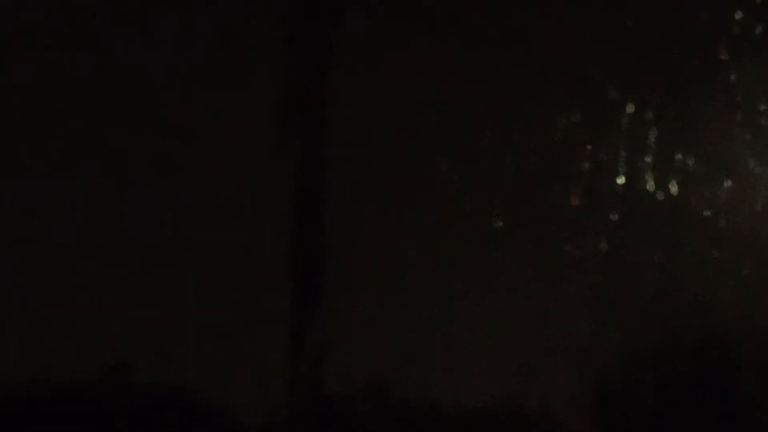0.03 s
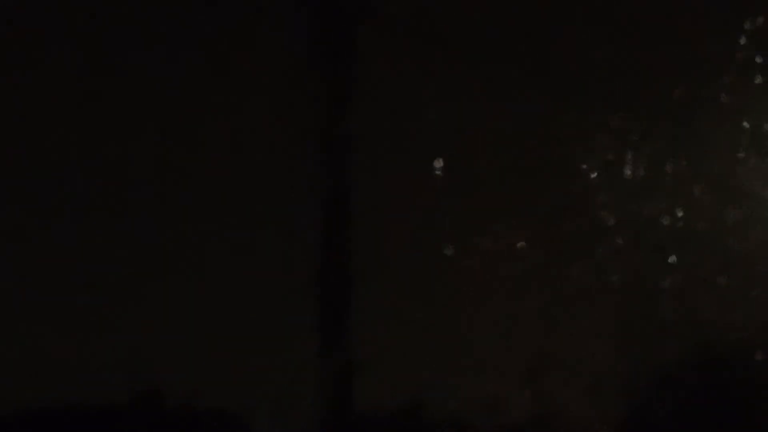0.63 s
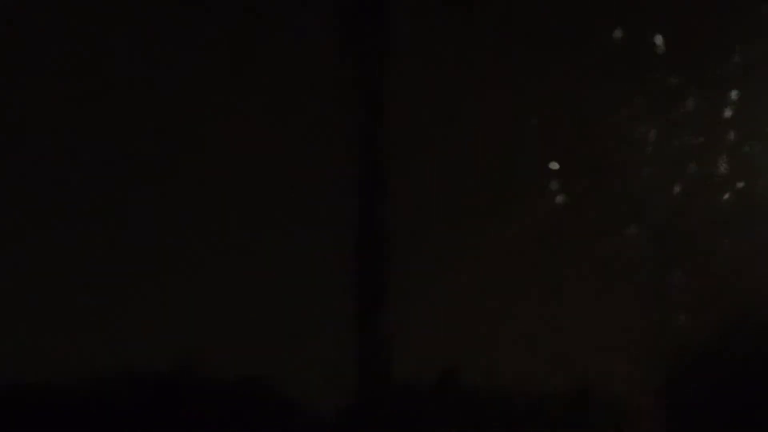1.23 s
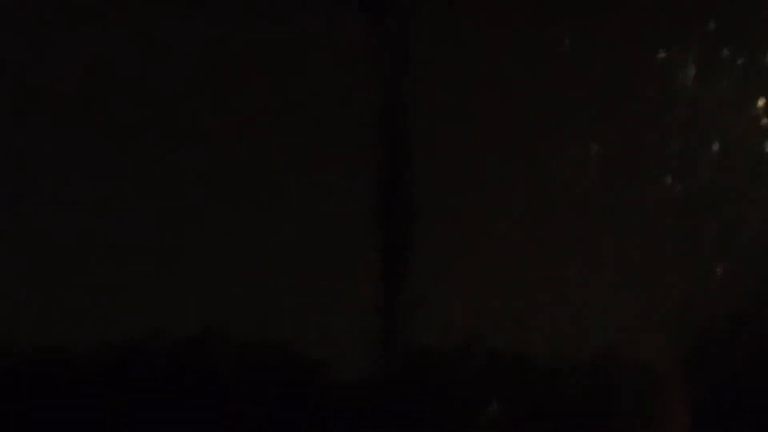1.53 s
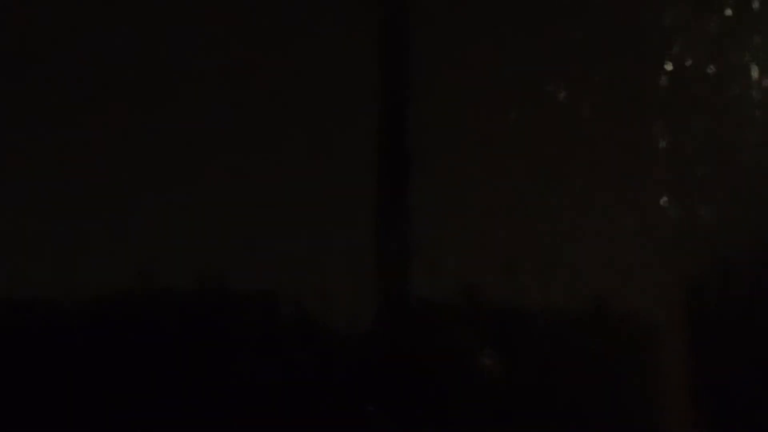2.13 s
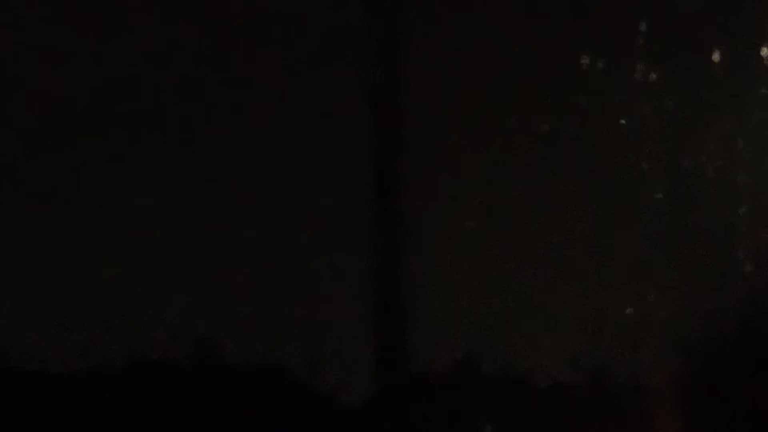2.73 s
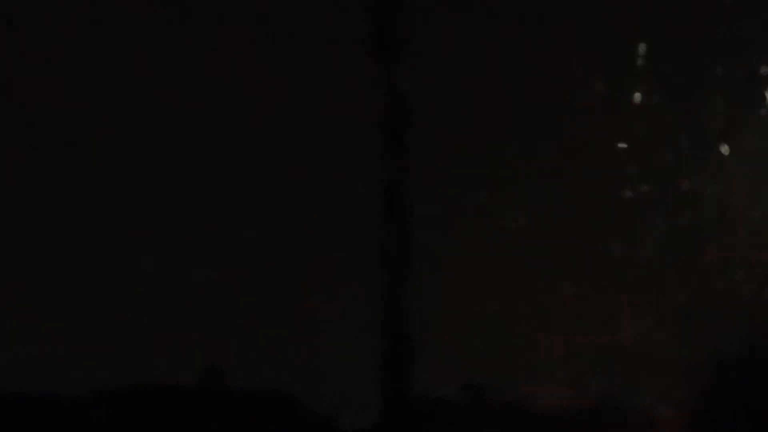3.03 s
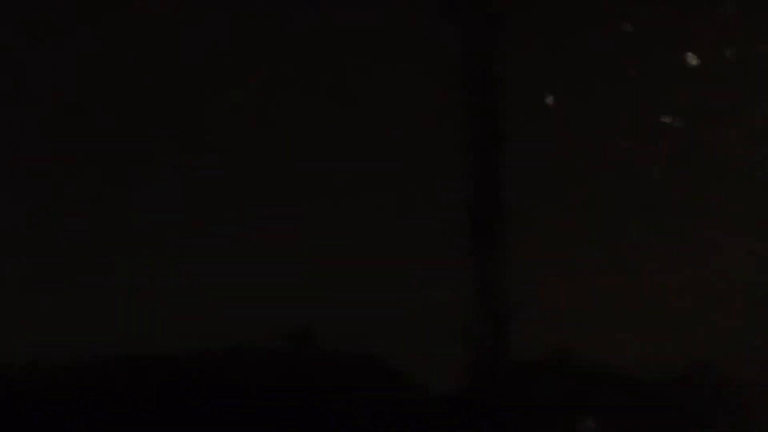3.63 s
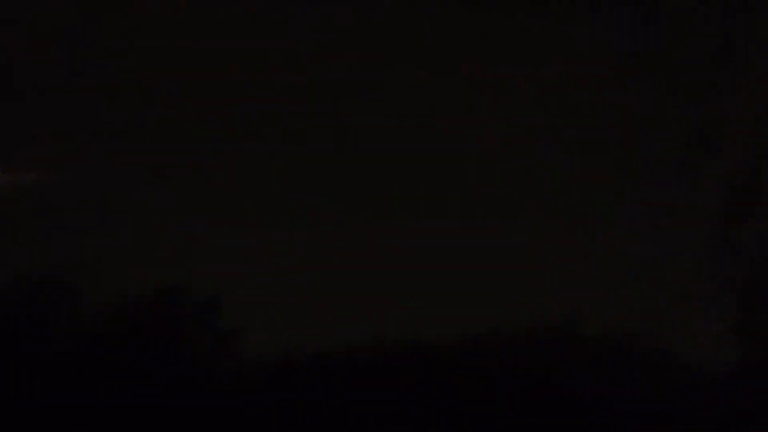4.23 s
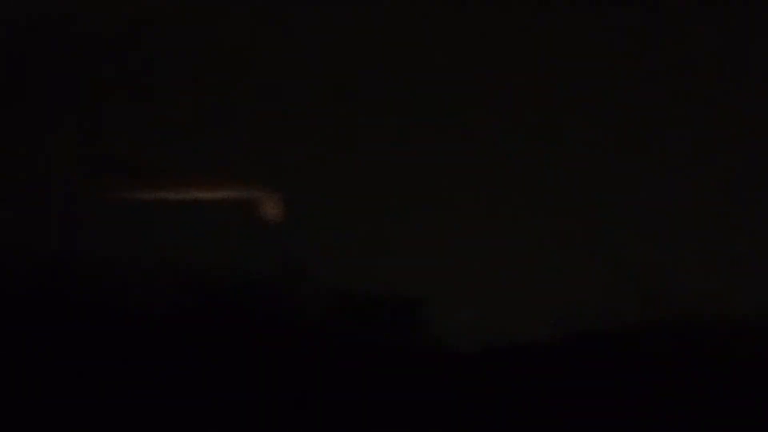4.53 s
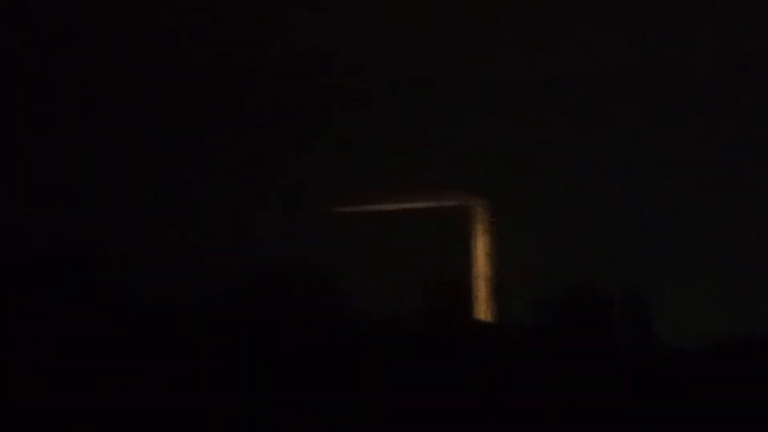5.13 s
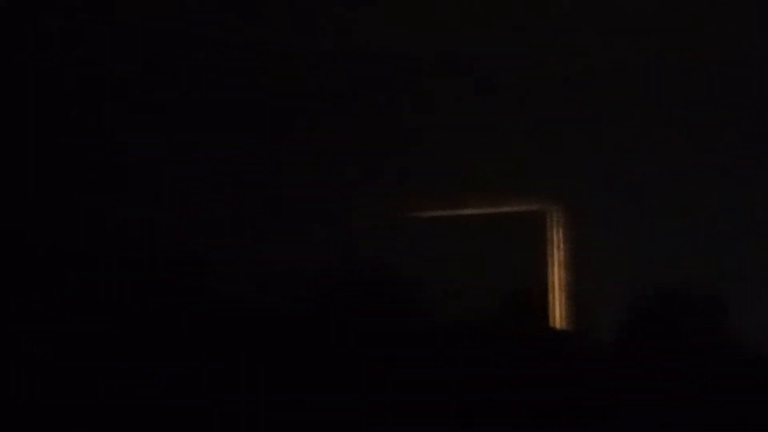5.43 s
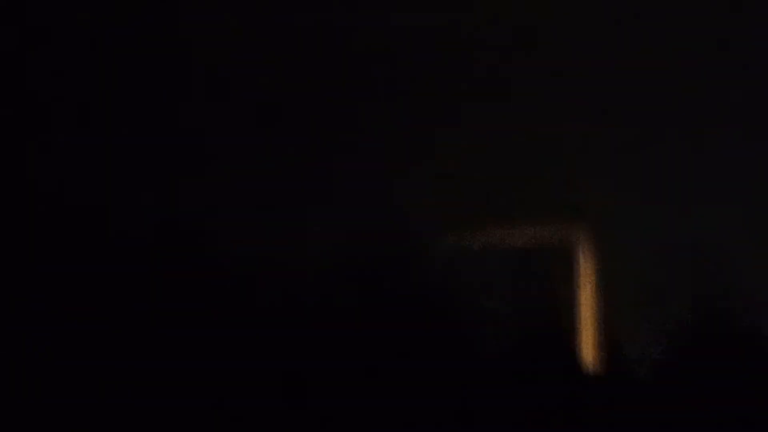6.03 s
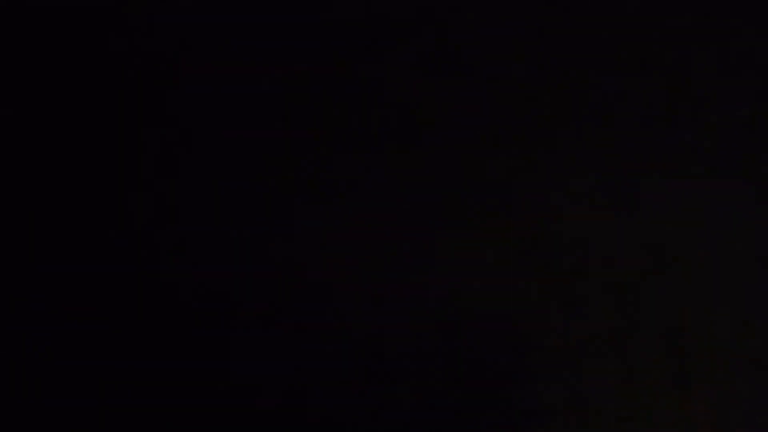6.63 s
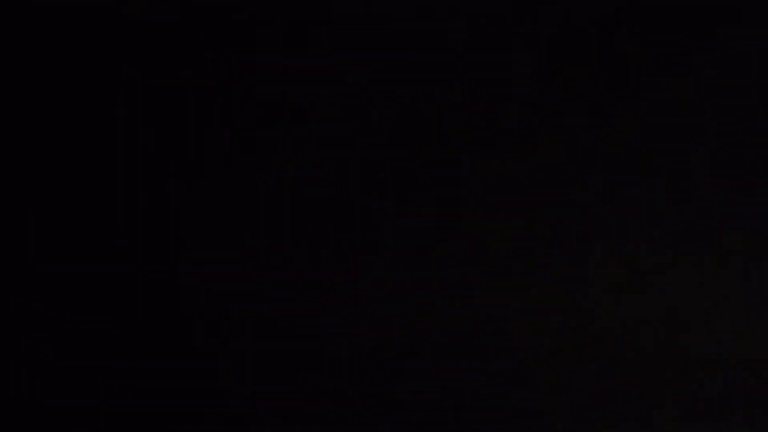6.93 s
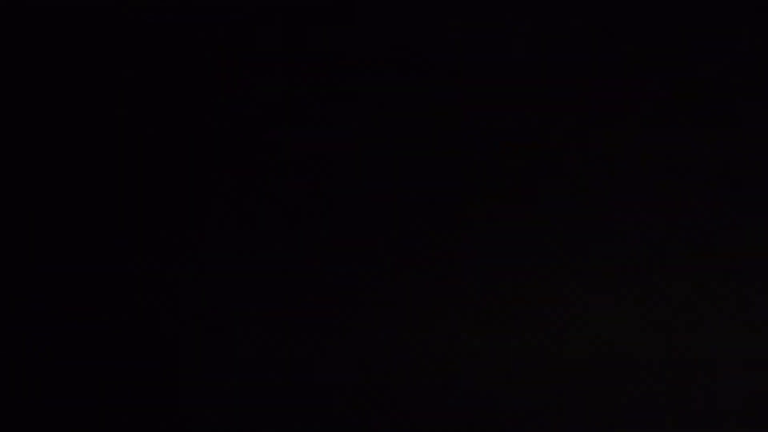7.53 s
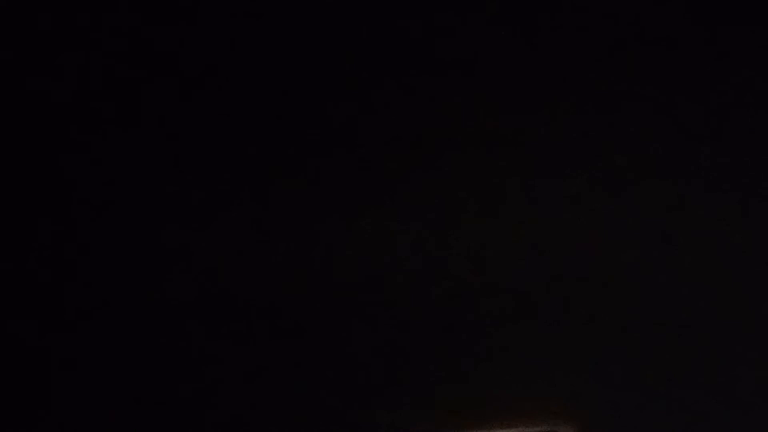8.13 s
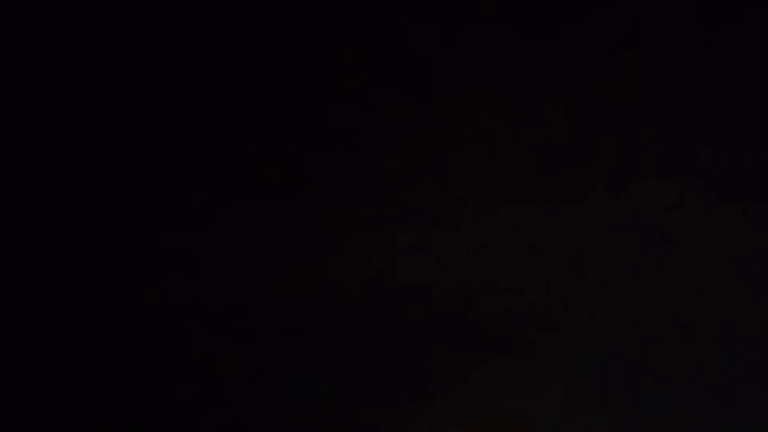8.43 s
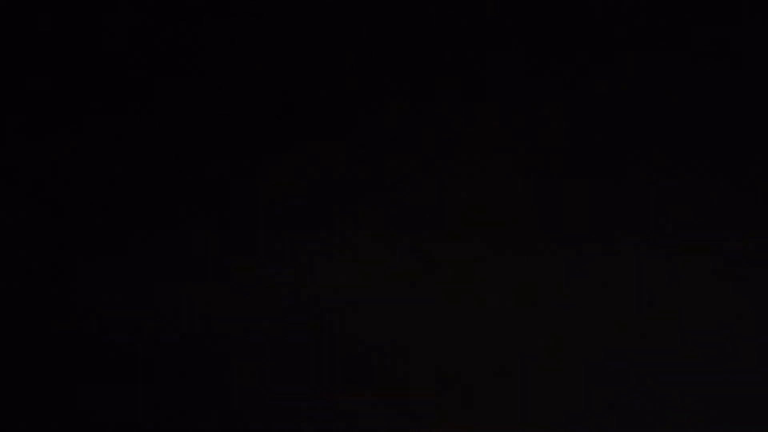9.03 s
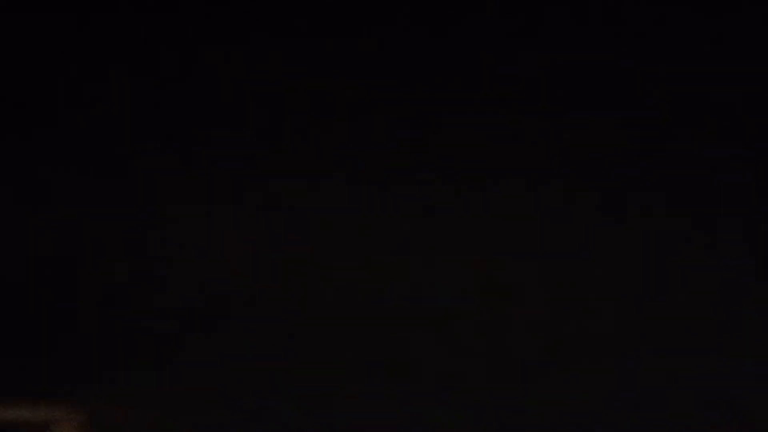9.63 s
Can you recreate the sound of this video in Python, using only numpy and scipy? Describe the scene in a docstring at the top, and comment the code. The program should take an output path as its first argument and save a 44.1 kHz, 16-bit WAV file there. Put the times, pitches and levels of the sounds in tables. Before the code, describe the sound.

Light rain falls throughout outside a house at night: a soft patter and fine spray all around, over a faint, low, distant wash. Fat drips tap a hard surface close by, several a second at uneven intervals, each with a short ring and a small splash. From about 2 to 3 seconds a gust hits the microphone in two bursts of sharp pops, low buffeting and throbbing rumble, by far the loudest sound. Wet leaves swish softly from 3 to about 4 seconds, and the drips grow a little stronger. The hand holding the microphone makes a cluster of dull bumps from about 4.3 to 5.7 seconds, then single knocks near 7.1 and 8.8 seconds, with faint ticks and finger brushes scattered around. The quiet rain and dripping continue to the end, near 10 seconds.

```python
"""Light rain at night

Heard from a house: a low far wash, patter all around, and fat drips that ring a hard surface close by.
A gust buffets and pops on the microphone for a second, then wet leaves swish as they touch and rub.
The hand that holds the microphone bumps and brushes its case."""
import sys
import numpy as np
from scipy import signal
from scipy.fft import rfft, irfft, next_fast_len
from scipy.io import wavfile
from scipy.ndimage import map_coordinates

SR = 44100
rng = np.random.default_rng(int(sys.argv[2]) if len(sys.argv) > 2 else 0)


def generate_wav(signal):
    """Clip the signal to [-1, 1] and save it as 16-bit WAV at the path in sys.argv[1]."""
    frames = np.transpose(np.atleast_2d(signal))
    scaled = np.clip(frames, -1, 1) * 32767
    pcm = np.round(scaled).astype(np.int16)
    wavfile.write(sys.argv[1], SR, pcm)


N = 436149

# How loud the outdoor background is: (time [s], level [dB])
NIGHT_LEVELS = [(0, -70.5), (.7, -66.5), (1.7, -71.5), (3.15, -68.5), (4.5, -69), (5.3, -66), (6.75, -69.5),
                (7.5, -70), (8.5, -72.5), (9.89, -71)]
# Low notes that build up between the walls: (pitch [Hz], width [Hz], level [dB])
WALL_MODES = [(170.9, 7.5, 1), (233.6, 14, -7.5)]
# The yard's echo; a t60 is the time to fade by 60 dB: (frequency [Hz], t60 [s])
ECHO_FADES = [(200, 0.23), (2000, 0.09), (8000, 0.049)]
# Soft bumps of the hand: (time [s], peak [dB], pitch [Hz], t60 of the push [s])
HAND_BUMPS = [(.615, -59.5, 80, .25), (1.285, -52, 151, 0.16), (4.302, -52, 182, 0.3),
              (4.73, -51, 175, 0.16), (4.826, -41.5, 159, 0.29), (4.92, -49.5, 152, 0.61),
              (5.032, -43, 147, 0.25), (5.117, -47.5, 176, 0.2), (5.231, -46, 166, 0.23),
              (5.279, -39, 170, 0.14), (5.555, -39.5, 166, 0.25), (5.633, -42.5, 250, 0.32),
              (5.675, -39.5, 240, 0.19), (5.853, -55, 114, 0.29), (6.39, -58.5, 111, 0.31),
              (6.537, -56.5, 127, 0.17), (7.067, -41, 332, 0.23), (8.802, -35, 314, 0.19),
              (8.808, -38, 161, 0.22)]
# Dry ticks of the case: (time [s], peak [dB], pitch [Hz], t60 [s])
CASE_TICKS = [(1.071, -56, 14600, 0.05), (1.077, -51, 7040, 0.034), (1.864, -51, 14700, 0.011),
              (1.922, -57, 6360, 0.16), (1.933, -54, 14100, 0.036), (6.675, -60, 8400, 0.02),
              (7.693, -53.5, 11440, 0.012), (8.453, -62, 11500, 0.013)]
# Fingers brushing the case: (start [s], end [s], level [dB])
FINGER_BRUSHES = [(1.062, 1.087, -55.5), (3.737, 3.859, -60.5), (4.239, 4.324, -61.5),
                  (5.653, 5.716, -54.5), (6.266, 6.302, -55), (6.393, 6.409, -49.5), (8.079, 8.101, -62),
                  (8.623, 8.659, -67)]
# Sharp pops of the gust on the microphone, and one later tap on the case:
# (time [s], level [dB], thump pitch [Hz], relative crack level [dB])
MIC_POPS = [(1.951, -39.5, 890, -1), (1.963, -28, 493, -9), (1.9714, -15.5, 202, -21),
            (2.0095, -21.5, 150, -28.5), (2.067, -17.5, 300, -9), (2.6615, -22.5, 217, -37),
            (2.674, -24, 248, -14), (2.7374, -19, 395, -36), (2.889, -17.5, 260, -29.5),
            (8.421, -50.5, 380, 5)]
# Puffs on the microphone: (start [s], end [s], buffet level [dB], rasp level [dB], treble limit [Hz])
WIND_PUFFS = [(1.933, 1.976, -48, -55, 8750), (1.965, 1.981, -20.5, -43, 1440),
              (1.984, 2.009, -35, -69, 2500), (2.013, 2.052, -29.5, -60, 5000),
              (2.046, 2.09, -20.5, -38, 14300), (2.078, 2.12, -20, -42, 13000),
              (2.571, 2.667, -44, -82, 560), (2.657, 2.683, -22.5, -44, 1500),
              (2.67, 2.695, -44, -44, 5250), (2.697, 2.731, -67, -52, 4400),
              (2.729, 2.744, -37, -37.5, 2010), (2.743, 2.795, -31.5, -65, 230),
              (2.797, 2.84, -21, -42.5, 14900), (2.837, 2.899, -27, -46.5, 13000),
              (2.927, 2.937, -30.5, -56, 700), (2.947, 2.976, -17.5, -36.5, 14000),
              (2.968, 2.994, -36.5, -35, 13900)]
# Deep rumbles as the wind passes: (start [s], end [s], level [dB])
WIND_SURGES = [(2.04, 2.156, -38), (2.662, 2.695, -38.5), (2.86, 2.964, -35.5)]
# Wet leaves moving after the gust: (start [s], end [s], level [dB])
LEAF_SWISHES = [(2.98, 3.053, -51.5), (3.077, 3.161, -58), (3.254, 3.333, -58), (3.378, 3.42, -62),
                (3.48, 3.58, -60.5), (3.646, 3.72, -64), (3.727, 3.871, -58), (3.996, 4.08, -62.5),
                (4.132, 4.162, -64)]
# How hard it rains: (time [s], patter level [dB], fine spray level [dB])
RAIN_LEVELS = [(0.0, -70.5, -79), (0.344, -78.5, -79.5), (0.666, -69, -77.5), (1.598, -71.5, -81.5),
               (1.9, -86.5, -73), (2.65, -72, -81.5), (3.05, -61, -77), (3.21, -73, -73.5),
               (3.32, -64, -73), (3.71, -64, -76), (4.29, -71, -77), (4.74, -67.5, -71.5),
               (5.68, -68, -74.5), (6.0, -79, -75), (6.34, -67.5, -70.5), (6.71, -70, -79),
               (7.15, -69, -75), (7.45, -68.5, -70.5), (7.82, -67.5, -69.5), (8.02, -71.5, -79),
               (9.89, -72, -81)]
# Notes, or modes, of the surface the drops hit: (pitch [Hz], width [Hz], level [dB])
SURFACE_MODES = [(530, 91, 8.5), (940, 86, -5), (1400, 57, 18), (1675, 120, 14.5), (2080, 77, 14),
                 (2153, 100, 12.5), (2780, 70, 3), (3070, 100, 1.5), (4340, 296, -3.5), (4900, 170, -7)]
# Fat drips close by: (time [s], level [dB], pitch [Hz], relative splash level [dB])
NEAR_DRIPS = [(.112, -49.5, 1390, -10), (0.2012, -39.5, 1340, -15), (.376, -49, 1620, -13),
              (0.4978, -47, 1990, -7.5), (0.5302, -56, 2030, -8), (.619, -47, 1440, -17),
              (0.64, -48, 1490, -8), (0.6995, -43, 2060, -16), (0.7159, -39, 1376, -14),
              (.7398, -47, 2760, -15), (.843, -54, 1520, -11), (0.8874, -57, 1780, -16),
              (0.9264, -48, 1580, -16), (1.021, -53, 1580, -11), (1.053, -48.5, 1440, -21),
              (1.061, -45, 1420, -13), (1.157, -52, 1310, -10), (1.4166, -50, 2410, -8),
              (1.461, -49, 1340, -15), (1.648, -49.5, 1366, -18), (1.7003, -56, 2100, -15),
              (1.8587, -41.5, 1520, -25.5), (2.143, -52.5, 2120, -13), (2.2254, -56, 1710, -19),
              (2.2798, -52, 1960, -14), (2.313, -50.5, 1630, -12.5), (2.3818, -52.5, 1570, -25),
              (2.394, -54, 1510, -26), (2.481, -51.5, 1820, -18), (2.517, -50, 1410, -18),
              (2.5292, -54, 1430, -17), (2.5946, -58, 2100, -2.5), (3.024, -50, 2480, -7.5),
              (3.0807, -39, 1480, -13.5), (3.111, -45, 2750, -13), (3.15, -52, 2230, -16.5),
              (3.267, -34.5, 1474, -8.5), (3.294, -45, 2330, -17), (3.356, -49, 2390, -12),
              (3.398, -43, 2380, -16), (3.492, -45, 3030, -10), (3.5304, -40, 1450, -15),
              (3.707, -42, 2280, -17), (3.767, -37, 2210, -11), (3.848, -40.5, 2500, -16),
              (3.8813, -48, 4220, -20), (3.938, -44, 2920, -16), (3.9971, -41, 2230, -7),
              (4.121, -44.5, 3300, -9), (4.1947, -53, 3200, -1), (4.2324, -42, 2380, -11.5),
              (4.4172, -47.5, 1300, -6), (4.461, -48.5, 4440, -12), (4.4823, -50, 1380, -9),
              (4.557, -41.5, 1930, -10), (4.803, -47.5, 2500, -15), (4.8446, -46, 2085, -20),
              (4.991, -48.5, 2450, -10), (5.0246, -47, 2370, -14), (5.22, -51, 3040, -32),
              (5.2656, -42.5, 2360, -12), (5.32, -49, 2340, -14), (5.382, -36, 1810, -20),
              (5.5001, -42.5, 2390, -11), (5.534, -46.5, 2160, -21), (5.581, -42, 1720, -13),
              (5.607, -44, 2200, -8.5), (5.677, -42.5, 1400, -5), (5.7426, -37.5, 4780, -18),
              (5.769, -57, 1670, -13), (5.824, -53, 1370, -27), (5.848, -53, 1900, -12),
              (5.88, -45, 1395, -9), (5.9537, -45, 1370, -8), (5.99, -50.5, 3900, -5),
              (6.178, -48.5, 1320, -7), (6.228, -50, 2410, -12), (6.297, -58, 1810, -22),
              (6.336, -38.5, 5090, -11), (6.3956, -40, 2210, -11), (6.523, -45.5, 1400, -15),
              (6.5405, -36.5, 1540, -17), (6.675, -55, 2860, -3), (6.702, -50, 1600, -11),
              (6.7538, -55.5, 2940, 5.5), (6.8482, -45.5, 1420, -10), (6.987, -40.5, 1350, -17),
              (7.07, -47, 4070, -5), (7.128, -49, 1370, -16), (7.145, -41.5, 1340, -9),
              (7.3143, -50, 1680, -9), (7.347, -45.5, 1550, -11), (7.436, -45, 1810, -9),
              (7.478, -45.5, 1930, -12), (7.5757, -59, 2230, -14), (7.7792, -53.5, 2230, -7),
              (7.8398, -50, 2650, -2.5), (7.922, -48, 1380, -17), (8.3193, -46.5, 1400, -22),
              (8.367, -45.5, 1416, -21), (8.4522, -57.5, 1690, 1), (8.839, -55, 1620, 1),
              (8.869, -52, 1500, -11), (9.029, -43, 1490, -40.5), (9.0602, -46.5, 1460, -24),
              (9.1469, -46.5, 2200, -11.5), (9.278, -51, 1620, -9.5), (9.3485, -56, 1390, -19),
              (9.5838, -50.5, 1470, -18), (9.6382, -52, 1420, -8), (9.705, -48, 1400, -11.5),
              (9.7555, -45.5, 1420, -14.5)]
# The tone of each noise, from bass to treble: (frequency [Hz], relative level [dB])
NIGHT_TONE = [(25, -53.5), (60, -8), (120, -5.5), (170, -2.5), (210, -7.5), (300, -8.5), (400, -9),
              (510, -11.5), (630, -15.5), (900, -17), (1200, -24.5), (3000, -26), (8000, -50),
              (16000, -43.5)]  # far wash
EDDY_TONE = [(22, -34.5), (45, 9.5), (90, 12.5), (160, 0), (230, -29), (500, -62.5), (1500, -69.5)]  # swirling air
BUFFET_TONE = [(22, -44), (45, -1), (80, 2), (150, 4.5), (300, -2), (450, -7), (700, -14.5), (1200, -26),
               (2200, -41), (5000, -72.5)]  # low push of a puff
RASP_TONE = [(300, -8.5), (900, 3.5), (1800, -1), (3500, -9), (6000, -14), (7200, -22), (8800, -35),
             (13500, -31.5), (15300, -22)]  # rough edge of a puff
PATTER_TONE = [(300, -28.5), (510, -0.5), (630, -12.5), (720, 1), (820, -9.5), (930, 0.5), (1220, -8),
               (1390, 1), (1620, -1), (1850, -3), (2200, 0.5), (2550, -4.5), (2780, -3.5), (3100, -3),
               (4000, -28.5), (9000, -66)]  # big drops
SPRAY_TONE = [(1500, -0.5), (3000, 0.5), (4000, 1), (5300, 5), (6700, 0.5), (7500, -6.5), (8500, -20),
              (13500, -36.5), (15000, -19), (16000, -11.5)]  # fine spray


def amp(db):
    """Turn decibels into a gain."""
    return 10 ** (np.asarray(db) / 20)


def unit(x):
    """Scale to an average (rms) level of 1."""
    return x / np.sqrt(np.mean(np.abs(x) ** 2) + 1e-20)


def crest(x):
    """Scale to a peak of 1."""
    return x / (np.abs(x).max() + 1e-20)


def along(points, hz):
    """Read between (frequency, value) points on a log frequency axis."""
    f, v = np.transpose(points)
    return np.interp(np.log(hz + 1), np.log(f + 1), v)


def curves(rows):
    """Draw a curve through time for each column after the first."""
    times, *columns = np.transpose(rows)
    return [np.interp(np.arange(N) / SR, times, column) for column in columns]


def gate(start, end, edge):
    """Switch on between two times, with soft edges."""
    t = np.arange(N) / SR
    return np.clip(np.minimum(t - start, end - t) / (2 * edge) + .5, 0, 1) ** 2


def swell(start, end, attack, t60):
    """Rise up to the start, hold until the end, then die away."""
    t = np.arange(N) / SR
    return np.clip(1 + (t - start) / attack, 0, 1) * amp(-60 * np.maximum(t - end, 0) / t60)


def wobble(rate):
    """A smooth curve through `rate` random values a second."""
    return map_coordinates(rng.standard_normal(int(N * rate / SR) + 4), [np.arange(N) * rate / SR])


def filtered(x, response):
    """Scale each frequency in x by response(frequency)."""
    size = next_fast_len(len(x) + 4096)
    return irfft(rfft(x, size) * response(np.fft.rfftfreq(size, 1 / SR)), size)[:len(x)]


def coloured(x, tone):
    """Shape x with a tone table, at an average level of 1."""
    return unit(filtered(x, lambda hz: amp(along(tone, hz))))


def noise(tone, length=N):
    """Steady noise with the given tone."""
    return coloured(rng.standard_normal(length), tone)


def ring(x, modes):
    """Let x ring a set of modes (pitch, width, level)."""
    return filtered(x, lambda f: sum(amp(db) * 1j * f * width / (hz * hz - f * f + 1j * f * width)
                                     for hz, width, db in modes))


def add(track, start, sound):
    """Mix a sound into the track at a time in seconds."""
    part = track[max(round(start * SR), 0):][:len(sound)]
    part += sound[:len(part)]


def shower(rate, spread_db, t60):
    """Random tiny hits of uneven size, each a burst of noise that dies fast."""
    draws = rng.random((int(rate * N / SR), 2))
    size = amp(-spread_db * np.log(np.maximum(draws[:, 1], .03)))
    hits = np.bincount((draws[:, 0] * N).astype(int), size ** 2, N)
    energy = signal.lfilter([1], [1, -np.exp(-np.log(10 ** 6) / (t60 * SR))], hits)
    return unit(np.sqrt(energy) * rng.standard_normal(N))


def splats(rate, spread_db, t60, low_hz, high_hz, count=4, rise_s=.0004, detune=.13):
    """Separate wet hits; each rings a few tones around its own pitch."""
    out, t = np.zeros(N), np.arange(SR // 20) / SR
    for when, size, pitch, life in rng.random((int(rate * N / SR), 4)):
        hz = (low_hz + pitch * (high_hz - low_hz)) * np.exp(detune * rng.standard_normal((count, 1)))
        tone = np.sin(2 * np.pi * (hz * t + rng.random((count, 1)))).sum(0)
        fade = (1 - np.exp(-t / rise_s)) * amp(-60 * t / (t60 * (.5 + life)))
        add(out, when * N / SR, amp(-spread_db * np.log(max(size, .06))) * fade * tone)
    return unit(out)


def background():
    """The wavering rumble of the night, a steadier drone between the walls, and a thin hiss."""
    level_db, = curves(NIGHT_LEVELS)
    rumble = amp(-1 + 3.4 * wobble(7.7)) * noise(NIGHT_TONE)
    drone_gain = amp(-0.5 + 2.2 * wobble(3))
    drone = unit(ring(ring(rng.standard_normal(N), WALL_MODES), [(184, 480, 0)]))
    hiss = noise([(13000, -54), (14800, -1.5), (15800, 1)])
    return amp(level_db) * (rumble + drone_gain * drone) + amp(-85.5) * hiss


def yard_echo(x):
    """Sound bounces briefly off the wall and yard; the treble dies first."""
    hz, t, spectrum = signal.stft(rng.standard_normal(SR // 2), SR, nperseg=256)
    tail = signal.istft(spectrum * amp(-60 * t / along(ECHO_FADES, hz)[:, None]), SR, nperseg=256)[1]
    return signal.fftconvolve(x, tail / np.linalg.norm(tail))[:N]


def handling(tick_width_hz=1300):
    """The hand thuds on the case like a soft hammer, makes it tick and brushes over it."""
    out, t = np.zeros(N), np.arange(SR // 3) / SR
    for start, db, hz, t60 in HAND_BUMPS:
        rise_s = 0.015 * t60  # a softer blow both builds and dies more slowly
        push = rng.standard_normal(len(t)) * (1 - np.exp(-t / rise_s)) * amp(-60 * t / t60)
        soft = filtered(push, lambda f: 1 / (1 + (f / (1.15 * hz)) ** 6) * f ** 4 / (f ** 4 + 80 ** 4))
        width_hz = 35 + 4 / t60  # a short blow has a less clear pitch
        add(out, start, amp(db) * crest(ring(soft, [(hz, width_hz, 0)])))
    for start, db, hz, t60 in CASE_TICKS:
        snap = rng.standard_normal(len(t)) * amp(-60 * t / t60)
        mode = [(hz, tick_width_hz, 0)]
        add(out, start, amp(db) * crest(ring(ring(snap, mode), mode)))
    strokes = sum(amp(db) * gate(start, end, edge=0.016) for start, end, db in FINGER_BRUSHES)
    return out + strokes * coloured(shower(rate=440, spread_db=-1.5, t60=0.076), SPRAY_TONE)


def mic_pops(crack_t60=0.0039, crack_hz=2400):
    """The gust's pressure pulses, and one later tap on the case: a dull thump under a short crack."""
    out, t = np.zeros(N), np.arange(SR // 10) / SR
    for start, db, hz, crack_db in MIC_POPS:
        thump_t60 = 0.012 * 400 / hz  # low thumps last longer
        thump = crest(np.sin(2 * np.pi * hz * t) * amp(-60 * t / thump_t60))
        snap = rng.standard_normal(len(t)) * amp(-60 * t / crack_t60)
        crack = filtered(snap, lambda f: 1 / (1 + 1j * f / crack_hz) ** 3)
        add(out, start, amp(db) * (thump + amp(crack_db - 1.5) * crest(crack)))
    return out


def eddies(start_s=2.05, end_s=2.68, crest_s=2.2, period_s=0.098, swing_db=7.5, fade_db_per_s=14.5):
    """Swirls of air roll off the case at a steady beat: a throbbing rumble that weakens."""
    age = np.clip(np.arange(N) / SR, start_s, end_s) - crest_s
    level_db = -39.5 + swing_db * np.cos(2 * np.pi * age / period_s) - fade_db_per_s * age
    return gate(start_s, end_s, edge=0.022) * amp(level_db) * noise(EDDY_TONE)


def wind(buffet_edge_s=0.015, rasp_edge_s=0.0091, lead_s=.02):
    """Puffs hit the microphone's opening: low buffeting, a rasp in the hard ones, rumble beneath."""
    out, t = np.zeros(N), np.arange(SR // 5) / SR - lead_s
    for start, end, buffet_db, rasp_db, limit_hz in WIND_PUFFS:
        def dull(f):
            return 1 / np.sqrt(1 + (f / limit_hz) ** 8)
        inside_s = np.minimum(t, end - start - t)
        puff = np.clip(inside_s / buffet_edge_s + .5, 0, 1) ** 2
        scrape = np.clip(inside_s / rasp_edge_s + .5, 0, 1) ** 2
        air = filtered(puff * noise(BUFFET_TONE, len(t)), dull)
        air *= np.sqrt(np.sum(puff ** 2) / (np.sum(air ** 2) + 1e-20))  # duller, but no quieter
        rasp = filtered(noise(RASP_TONE, len(t)), dull)
        rasp *= scrape * np.sqrt(0.41 + 0.53 * air ** 2)  # strongest at the pressure peaks
        add(out, start - lead_s, amp(buffet_db) * air + amp(rasp_db + 0.5) * rasp)
    surge = sum(amp(db) * gate(start, end, edge=.02) for start, end, db in WIND_SURGES)
    deep = surge * noise([(20, -39), (42, -1), (75, 6.5), (200, -29), (800, -79)])
    return out + eddies() + deep


def leaves():
    """Wet leaves swish: a flurry of tiny touches, and hollow notes that each swell in their own time."""
    stir = np.sqrt(sum((amp(db) * swell(start, end, attack=0.018, t60=0.08)) ** 2
                       for start, end, db in LEAF_SWISHES))
    touches = splats(rate=260, spread_db=0.5, t60=0.02, low_hz=507, high_hz=7050)
    flurry = amp(-5) * coloured(touches, PATTER_TONE) + amp(-8) * coloured(touches, SPRAY_TONE)
    rub = shower(rate=200, spread_db=2, t60=0.071)
    modes = [(560, 380, -4.5), (1010, 400, -7.5), (1594, 245, -1), (2293, 270, 1),
             (2763, 133, 2.5), (3200, 130, 0.5), (4370, 400, -7.5)]
    hollow = unit(sum(amp(db + 4 * wobble(16)) * ring(ring(rub, [(hz, width, 0)]), [(hz, width, 0)])
                      for hz, width, db in modes))
    return stir * amp(1.3 * wobble(11)) * (amp(-4.5) * flurry + amp(-0.5) * hollow)


def taps(rate, spread_db, t60, spots):
    """Drops hit several spots on the surface; each spot rings its own mix of the modes."""
    out = np.zeros(N)
    for _ in range(spots):
        hits = shower(rate / spots, spread_db, t60)
        out += ring(hits, [(hz, width, db + 4 * rng.standard_normal()) for hz, width, db in SURFACE_MODES])
    return unit(out)


def rain():
    """Big drops splat and tap the surface, small ones tick, and far ones blur into a wash."""
    patter_db, spray_db = curves(RAIN_LEVELS)
    big = splats(rate=130, spread_db=4, t60=.036, low_hz=603, high_hz=3420)
    small = splats(rate=150, spread_db=4.5, t60=.02, low_hz=2490, high_hz=7460)
    splatter = shower(rate=80, spread_db=2, t60=0.054)
    patter = amp(-6) * coloured(big, PATTER_TONE) + amp(-7) * coloured(splatter, PATTER_TONE)
    patter += amp(-11) * taps(rate=80, spread_db=2.5, t60=0.023, spots=5)
    patter += amp(-16) * noise(PATTER_TONE)
    spray = amp(-8) * coloured(small, SPRAY_TONE) + amp(-7.5) * coloured(splatter, SPRAY_TONE)
    spray += amp(-6.5) * noise(SPRAY_TONE)
    flurry_db = 1.97 * wobble(13)  # drops fall in loose bunches
    return amp(flurry_db) * (amp(patter_db + 0.5) * patter + amp(spray_db + 4.5) * spray)


def droplets(t, hz, flight_s=0.026, t60=0.013, detune=.2, count=4):
    """Droplets thrown up by a drip land one after another, each at its own pitch."""
    age = np.maximum(t - flight_s * rng.uniform(0.1495, 1, (count, 1)), 0)
    pitch = hz * np.exp(detune * rng.standard_normal((count, 1)))
    size = rng.uniform(0.71, 1, (count, 1))
    return np.sum(size * np.sin(2 * np.pi * pitch * age) * amp(-60 * age / t60), axis=0)


def struck_surface(blow, detune=.07):
    """A blow slaps the surface and rings it, a little higher or lower from spot to spot."""
    spot = np.exp(rng.normal(0, detune))
    modes = [(hz * spot, width, db + rng.normal(0, 5.1)) for hz, width, db in SURFACE_MODES]
    slap = coloured(blow, [(hz, db + rng.uniform(-4.5, 5)) for hz, db in PATTER_TONE])
    ringing = filtered(ring(blow, modes), lambda f: 1 / (1 + (f / 5500) ** 8))
    return amp(-9.5) * crest(ringing) + amp(-13) * crest(slap)


def ping(t, hz, softness):
    """A drip's own wavering note; a softer drip swells more slowly and rings longer."""
    wander = np.cumsum(rng.normal(0, .06, len(t)))
    rise_s, t60 = 0.00045 * softness, 0.024 * softness ** 0.11
    tone = np.sin(2 * np.pi * hz * t + wander)
    return crest(tone * (1 - np.exp(-t / rise_s)) ** 2 * amp(-60 * t / t60))


def drips(burst_t60=0.0066, scatter_t60=0.07, splash_t60=0.085, graze_s=0.0054, lead_s=.01):
    """Each fat drip strikes the surface, pings, splashes and scatters droplets."""
    out, age = np.zeros(N), np.arange(SR // 8) / SR - lead_s
    t = np.maximum(age, 0)
    for start, db, hz, splash_db in NEAR_DRIPS:
        softness = 2 ** (max(-17 - splash_db, 0) / 9)  # a drip that hardly splashes lands softly
        onset = 1 - np.exp(-t / (0.0008 * softness))
        rebound_age = t - 0.01 * np.exp(rng.normal(0, 0.26))  # one droplet jumps and lands again
        rebound = (rebound_age > 0) * amp(-9 - 60 * np.abs(rebound_age) / burst_t60)
        burst = amp(-60 * t / burst_t60) + rebound
        graze = amp(-17) * np.exp(-np.abs(age) / graze_s)  # first touch, before the bulk lands
        scatter = amp(-10 - 60 * t / scatter_t60)
        blow = (graze + onset * (burst + scatter)) * rng.standard_normal(len(t))
        tap = struck_surface(blow) / np.sqrt(softness)
        tap += amp(-1) * ping(t, hz, softness) / (1 + amp(splash_db + 12))  # more splash, less ping
        splash_tone = [(f, level + rng.uniform(-13.5, 5.9)) for f, level in SPRAY_TONE]
        splash_fade = amp(2.5) * burst + amp(-8 - 60 * t / splash_t60)
        splash = noise(splash_tone, len(t)) * onset * splash_fade
        add(out, start - lead_s, amp(db) * (tap + amp(-13) * droplets(t, hz) + amp(splash_db) * splash))
    return out


def scene():
    """Rain, leaves and drips, dulled by distance; wind and hand right at the microphone."""
    near = drips()
    outdoors = rain() + leaves() + near + amp(-8.5) * yard_echo(near)
    outdoors = filtered(outdoors, lambda hz: amp(along([(6800, -0.5), (8500, -3.5), (14000, -9)], hz)))
    return (outdoors + background() + wind() + handling() + mic_pops())[None]


def record(dry, low_cut_hz=36, top_hz=15850):
    """The microphone loses the deepest bass and the highest treble."""
    low_cut = signal.butter(2, low_cut_hz, "highpass", fs=SR, output="sos")
    return np.array([filtered(signal.sosfilt(low_cut, channel), lambda hz: hz < top_hz)
                     for channel in dry])


dry = scene()
out = record(dry)
generate_wav(out)
```